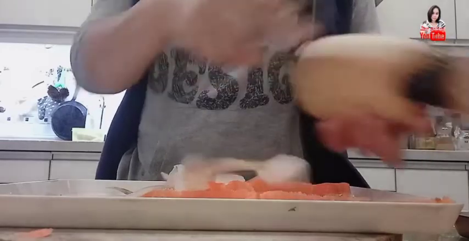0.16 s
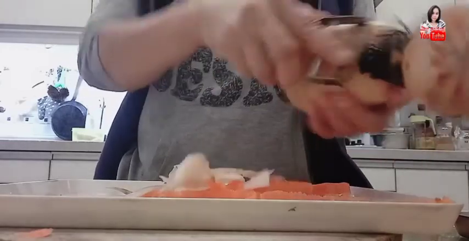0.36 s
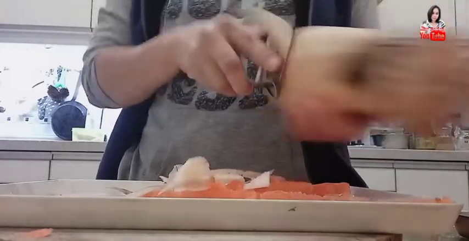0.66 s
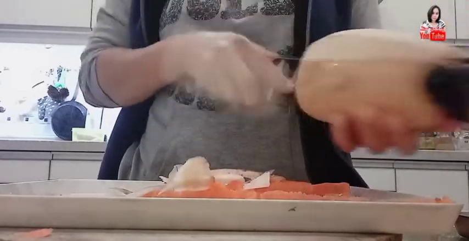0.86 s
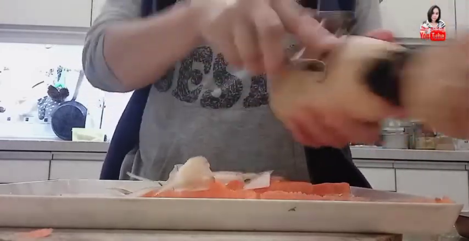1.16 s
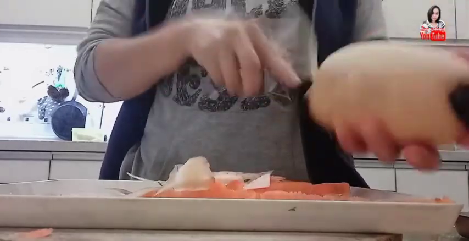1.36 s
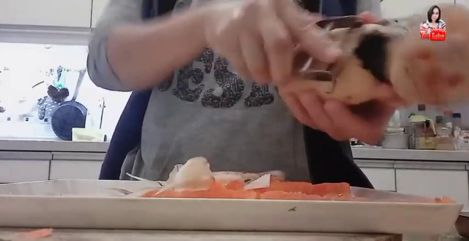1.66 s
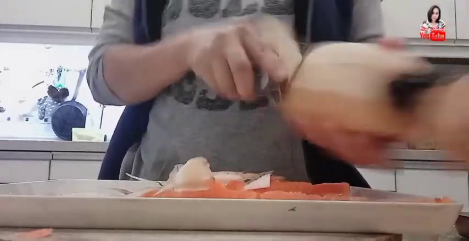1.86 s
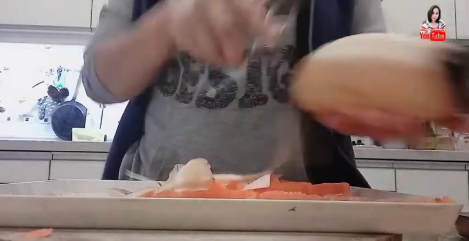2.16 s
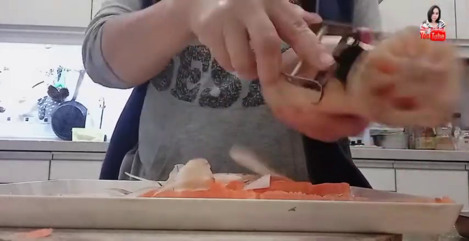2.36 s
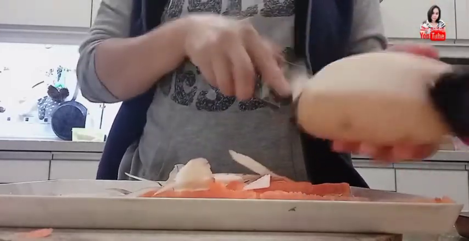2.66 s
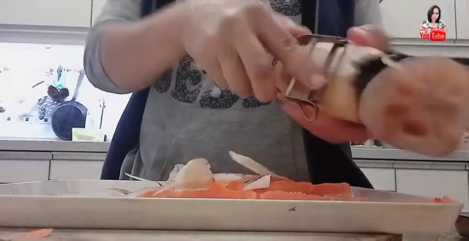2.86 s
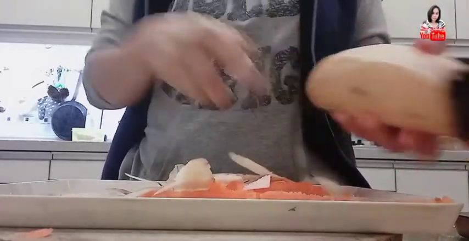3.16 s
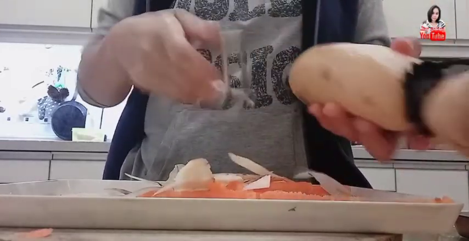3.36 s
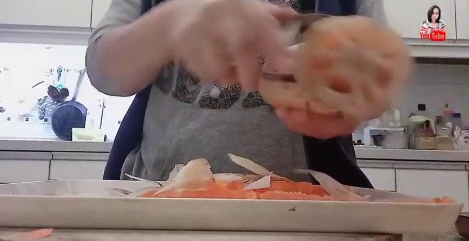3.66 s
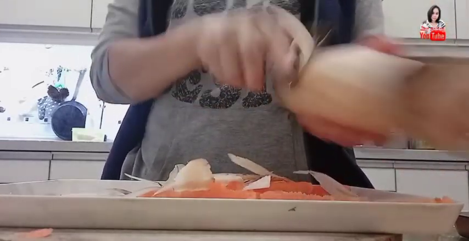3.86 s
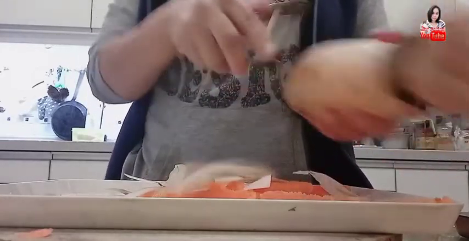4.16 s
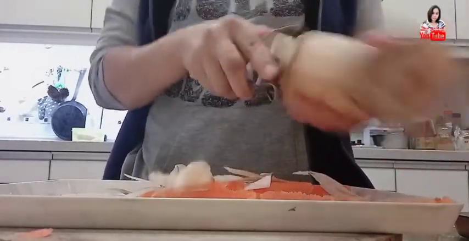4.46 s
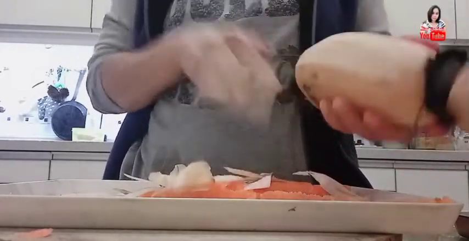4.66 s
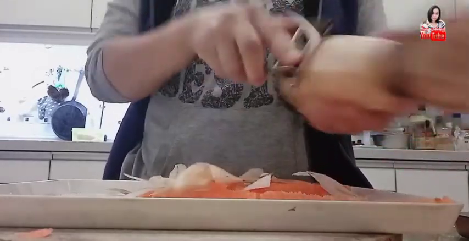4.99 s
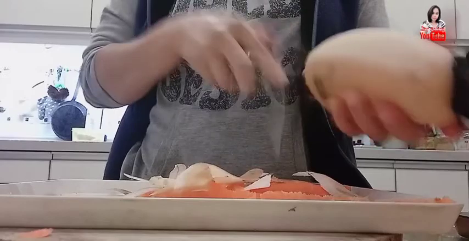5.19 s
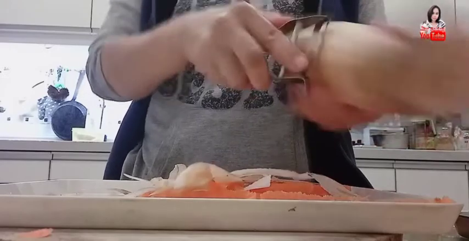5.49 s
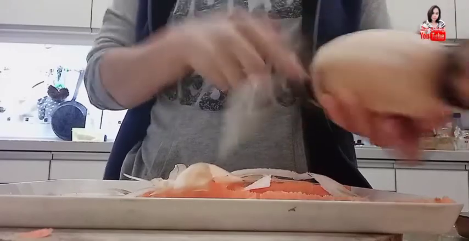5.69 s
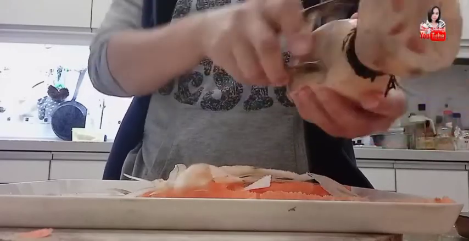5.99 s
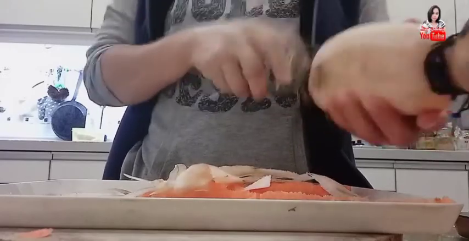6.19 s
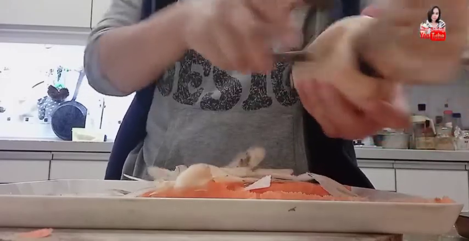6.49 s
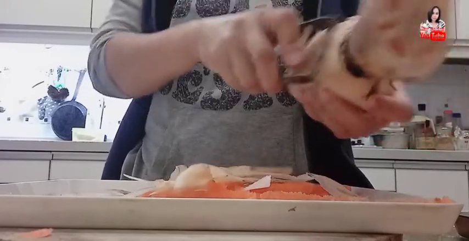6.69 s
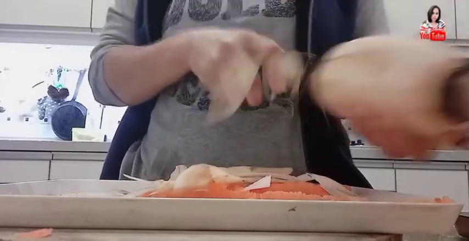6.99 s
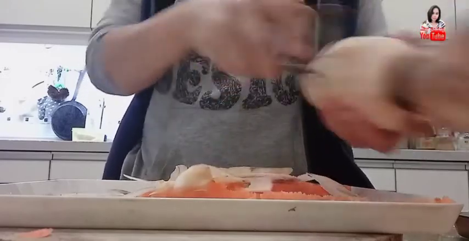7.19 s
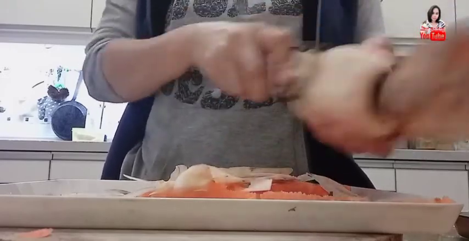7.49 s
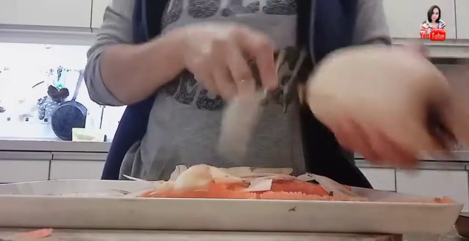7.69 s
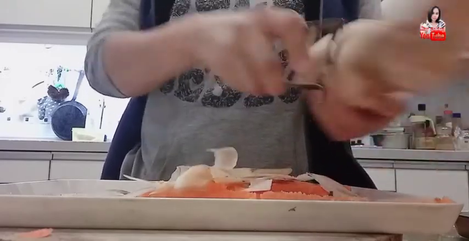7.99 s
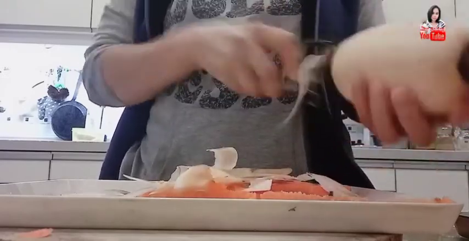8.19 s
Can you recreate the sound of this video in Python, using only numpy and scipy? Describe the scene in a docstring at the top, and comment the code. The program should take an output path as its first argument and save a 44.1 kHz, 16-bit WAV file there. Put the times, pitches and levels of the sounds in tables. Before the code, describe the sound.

Close in a hard, lightly reverberant kitchen, a swivel peeler scrapes a firm root in quick irregular strokes. It opens with a bright metallic ring and a short rasp; fuller, fibrous scrapes follow at about 0.6, 1.2 and 1.8 seconds, with a sharp bite near 1.6. Loose-blade clicks fill the gaps, clustering near 2.35, with soft knocks near 0.8, 2.0 and 3.1. After a lighter patch around 3 seconds, strokes resume at 3.8 and come closer together, with crisp bites at 4.3 and 5.4 and the heaviest dull thud at 5.6. A tiny rough upward squeak comes at 6.4, a hard bite at 6.6, then dense strong rasps near 6.9 and 7.4, a woody thump at 7.6 and final scrapes past 8. Thin steel rings fade quickly; a faint low appliance hum, gently beating, continues underneath.

```python
"""Peeling a root vegetable

A swivel peeler is drawn along a firm root over a tray, close to a phone microphone in a hard kitchen.
Snapping fibres (uneven noise) ring the root and hiss at the edge; the blade bites, knocks and rattles.
Freed steel rings and tray thuds are damped partials; a short rough squeak glides up.
A fan or fridge hums behind: noise bands and motor tones. The hard walls add a diffuse tail."""
import sys
import numpy as np
from scipy import signal
from scipy.fft import rfft, irfft
from scipy.io import wavfile
from scipy.ndimage import uniform_filter1d

SR = 44100
rng = np.random.default_rng(int(sys.argv[2]) if len(sys.argv) > 2 else 0)


def bounce(signal):
    """Save signal as a 16-bit WAV file at the path given by the first command-line argument."""
    frames = np.transpose(np.atleast_2d(signal))
    limited = np.clip(frames, -1, 1)
    pcm = np.round(limited * 32767).astype(np.int16)
    wavfile.write(sys.argv[1], SR, pcm)


N = 367792
T = np.arange(N) / SR

# resonances of the root and the gripping hand: (frequency [Hz], width [Hz], level [dB])
ROOT_MODES = [(462, 136, -9.5), (817, 166, -7), (1211, 210, -3), (1505, 99, -2), (1783, 140, -1),
              (2196, 228, -2.5), (2775, 343, -4), (3470, 490, -25.5)]


def undb(db):
    """Decibels to gain."""
    return 10 ** (np.asarray(db) / 20)


def unit(x):
    """Scale to rms 1."""
    return x / np.sqrt(np.mean(x ** 2))


def resonate(x, hz, width_hz):
    """Two-pole resonance, gain 1 at the centre."""
    return signal.lfilter(*signal.iirpeak(hz, hz / width_hz, fs=SR), x)


def colour(x, points):
    """Give x a (Hz, dB) spectrum, keeping the rms of white noise."""
    hz, db = np.transpose(points)
    bins_hz = np.fft.rfftfreq(N, 1 / SR)
    gain = undb(np.interp(np.log(bins_hz + 1), np.log(hz), db))
    return irfft(rfft(x) * unit(gain), N)


def walk(rate_hz):
    """Random levels, rms 1, held for 1 / rate_hz and slewed."""
    k = int(SR / rate_hz)
    steps = np.repeat(rng.standard_normal(N // k + 1), k)
    return unit(uniform_filter1d(steps, k)[:N])


def fibres(scatter_db, judder_db, judder_hz):
    """Dense snaps of uneven size; the blade's judder bunches them."""
    snaps = rng.standard_normal(N) * undb(scatter_db * rng.exponential(size=N))
    return unit(snaps * undb(judder_db * walk(judder_hz)))


def burst(start_s, rise_ms, fall_ms):
    """Square-law swell to a peak of 1, then exponential decay."""
    ms = 1000 * (T - start_s)
    return np.clip(ms / rise_ms, 0, 1) ** 2 * np.exp(-np.clip(ms - rise_ms, 0, None) / fall_ms)


def favour(hz):
    """Gain per root mode: the grip lifts modes near hz and lowers those far off."""
    range_db, width_octaves = 9, .17
    modes_hz = np.array(ROOT_MODES)[:, :1]
    nearness = np.exp(-(np.log2(modes_hz / hz) / width_octaves) ** 2)
    return undb(range_db * (nearness - .5))


def stroke_drive():
    """Each pull sinks in, swells, sags and lifts out; hiss follows tearing dB for dB."""
    # pulls of the blade: (time in the cut [s], swell [ms], sag [ms], entering level [dB], peak level [dB],
    # leaving level [dB], hiss re tearing [dB], favoured root frequency [Hz])
    strokes = [(0.0, 10, 63, -49, -47, -61.5, 2, 2360), (0.365, 4.6, 38, -45, -44.5, -52, -7, 1910),
               (0.618, 71, 107, -45, -37.5, -47, -4.5, 2040),
               (1.183, 50.5, 64, -49, -46.5, -48, -3.5, 2100), (1.61, 30, 10, -56, -46, -54, -6, 1980),
               (1.793, 58, 190, -44.5, -37.5, -52.5, -4, 1970),
               (2.424, 67, 104, -43.5, -40.5, -42, -4.5, 1840), (2.93, 46, 20, -60, -61, -53.5, -7, 1770),
               (3.03, 12, 71, -45, -52.5, -60, -4, 1820), (3.768, 118, 130, -46, -39.5, -47, -7, 2037),
               (4.321, 26, 6.9, -53, -43.5, -57, -16, 1880), (4.434, 74, 80, -48, -40.5, -46, -3, 2260),
               (4.625, 9.3, 18, -47.5, -40.5, -59, -9.5, 1940),
               (4.962, 69, 81, -47.5, -44.5, -45.5, -4, 2070),
               (5.459, 41, 85.5, -48, -42.5, -43, -5.5, 2420), (5.61, 5, 17, -62, -52, -70, -7, 1200),
               (6.03, 123, 48, -50, -41.5, -49.5, -4, 1970), (6.624, 15, 4.5, -49.5, -47.5, -53, -12, 1820),
               (6.69, 17, 9.2, -60, -46.5, -53, -5, 1830), (6.864, 32.4, 61, -40.5, -37, -42, -5, 1930),
               (6.99, 6.8, 14, -38, -42.5, -40, -11, 1520),
               (7.345, 53.5, 47, -45.5, -40.5, -44, -0.5, 1680),
               (7.562, 51, 56, -42, -40.5, -53.5, -3.5, 1900), (8.01, 46, 104, -48.5, -45, -45, -3.5, 2400),
               (8.205, 8.3, 9.1, -47, -41, -52, -12, 2290)]
    sink_ms, lift_ms, faint_db, touch_s = 27, 24.4, -24, .0068
    root, edge = np.zeros((len(ROOT_MODES), N)), np.zeros(N)
    for s, swell_ms, sag_ms, in_db, peak_db, out_db, hiss_db, hz in strokes:
        ms = np.cumsum([0, sink_ms, swell_ms, sag_ms, lift_ms]) - sink_ms
        times_s = s + ms / 1000
        levels_db = [in_db + faint_db, in_db, peak_db, out_db, out_db + faint_db]
        db = np.interp(T, times_s, levels_db)
        inside_s = np.minimum(T - times_s[0], times_s[-1] - T)
        touch = np.clip(inside_s / touch_s + 1, 0, 1)
        root += touch * undb(db) * favour(hz)
        edge += touch * undb(db + hiss_db)
    return root, edge


def bite_and_knock_drive():
    """Bites of the landing blade and soft knocks at stroke ends load root and edge; low ones are slower."""
    # bites and knocks: (time [s], root peak level [dB], edge re root peak [dB], favoured root frequency [Hz])
    bites_and_knocks = [(0.022, -44.5, 4, 2200), (0.332, -42.5, 7, 2170), (0.836, -41, -12, 1200),
                        (1.157, -42, 6.5, 1950), (1.579, -29, -3.5, 1880), (2.041, -38, -8, 1210),
                        (2.332, -41.5, 6, 1900), (2.895, -46, 4.5, 2350), (3.062, -42.5, 0, 1570),
                        (3.325, -53.5, 9, 2380), (3.699, -41.5, 6, 2600), (3.708, -36.5, -7, 2190),
                        (4.29, -32, -2, 2230), (4.43, -45, -21, 2300), (4.937, -39.5, -2.5, 1860),
                        (5.404, -32.5, 2.5, 2700), (5.599, -34, -8, 900), (5.98, -34.5, -3, 2820),
                        (6.59, -30, -6, 1750), (7.308, -32.5, 0.5, 1830), (7.553, -48, 8.5, 2350),
                        (7.638, -33, -31, 1200), (7.667, -39, -17, 1300), (7.962, -42.5, 6, 2880)]
    rise_ms, fall_ms, lead_s = 5.6, 5.2, .0033  # when 2000 Hz is favoured
    root, edge = np.zeros((len(ROOT_MODES), N)), np.zeros(N)
    for s, db, edge_db, hz in bites_and_knocks:
        stretch = (2000 / hz) ** .5
        shape = burst(s - lead_s * stretch, rise_ms * stretch, fall_ms * stretch) * undb(db)
        root += shape * favour(hz)
        edge += shape * undb(edge_db)
    return root, edge


def rattle_drive():
    """Pivot clicks drive the root; their hiss is duller the more goes into the root."""
    # clicks of the loose blade: (time [s], level [dB], root share re level [dB])
    rattles = [(0.175, -65, -1), (0.282, -62.5, 2), (0.576, -53, -3), (0.86, -43, -8), (0.9653, -58.5, 4),
               (1.1092, -52, -3), (1.324, -47, -10), (1.4706, -57.5, -9), (1.5254, -64, 4), (1.99, -42, -3),
               (2.075, -45, -17), (2.347, -42, -7.5), (2.356, -38, -10), (2.367, -49, -8),
               (2.635, -50, -12), (2.8104, -47.5, -6.5), (2.8459, -60.5, -7), (3.023, -64, 8),
               (3.135, -53, -8), (3.193, -51.5, -1), (3.3346, -57, -23), (3.3794, -63, 2.5),
               (3.405, -59, -10), (3.486, -62, -13), (4.0513, -44, -5), (4.09, -51.5, -5), (4.131, -65, 3),
               (4.2495, -49.5, -4), (4.6136, -39, -3), (4.6618, -46.5, -19), (4.69, -48.5, -4),
               (4.779, -57, -16), (4.8447, -64, 3), (5.135, -49, -19), (5.342, -58, -14), (5.366, -64, 5),
               (5.6638, -50.5, 4.5), (5.775, -56, -11), (6.2214, -47, 3), (6.2874, -44.5, -11),
               (6.573, -47, -0.5), (6.688, -56.5, 9.5), (7.0335, -45.5, -18), (7.129, -66.5, 7),
               (7.8201, -57, 10.5), (7.894, -64, 4.5), (8.034, -48, -3), (8.2493, -46.5, -5)]
    rise_ms, fall_ms, lead_s = 2.1, 5.4, .001
    root, edge, dull = np.zeros(N), np.zeros(N), np.zeros(N)
    for s, db, root_db in rattles:
        shape = burst(s - lead_s, rise_ms, fall_ms) * undb(db)
        root += shape * undb(root_db)
        edge += shape / (1 + undb(2 * root_db))
        dull += shape / (1 + undb(-2 * root_db))
    return root, edge, dull


def root_body(drives):
    """Parallel root resonances of alternating sign, one drive each."""
    out = np.zeros(N)
    for k, (hz, width_hz, db) in enumerate(ROOT_MODES):
        out += (-1) ** k * undb(db) * resonate(drives[k], hz, width_hz)
    return out


def patchy(x):
    """Split into narrow overlapping bands, 2 to 16 kHz, each with its own wandering level."""
    depth_db, per_octave, wander_hz = 3.5, 9, 14.
    place = per_octave * np.log2(np.fft.rfftfreq(N, 1 / SR) + 1)
    spectrum, out = rfft(x), np.zeros(N)
    for centre in range(11 * per_octave, 14 * per_octave + 1):
        band = irfft(spectrum * np.clip(1 - np.abs(place - centre), 0, 1), N)
        out += band * unit(undb(depth_db * walk(wander_hz)))
    return out


def peeling():
    """Fibre noise, shaped by strokes, bites, knocks and rattles, excites root modes and edge hiss."""
    # hiss of the cutting edge, with the microphone port peak: (frequency [Hz], relative density [dB per Hz])
    edge_spectrum = [(1940, -24), (3300, -16.5), (3660, -6), (4790, -6.5), (6460, -2.5), (7510, -6),
                     (8170, -5.5), (10000, -11.5), (12600, -16), (13900, -10), (14600, 0.5), (15200, 2),
                     (15700, -4)]
    wander_db, wander_hz, dull_hz = 3.0, 30., 9600
    stroke_root, stroke_edge = stroke_drive()
    bite_root, bite_edge = bite_and_knock_drive()
    rattle_root, rattle_edge, dull = rattle_drive()
    root = stroke_root + bite_root + rattle_root
    edge = stroke_edge + bite_edge + rattle_edge

    tear = fibres(scatter_db=2.5, judder_db=1.5, judder_hz=152.0)
    wander = np.array([undb(wander_db * walk(wander_hz)) for _ in ROOT_MODES])
    torn = root_body(tear * root * wander) / np.std(root_body(tear * wander))

    hiss = fibres(scatter_db=1.5, judder_db=1.0, judder_hz=196.0)
    lowpass = signal.butter(4, dull_hz, fs=SR, output="sos")
    muffled = signal.sosfilt(lowpass, hiss * dull)
    return torn + patchy(colour(hiss * edge + muffled, edge_spectrum))


def motor_tone(hz, db):
    """Sine with slight random drift in pitch and level."""
    phase = 2 * np.pi * np.cumsum(hz * (1 + .002 * walk(10.))) / SR
    return np.sqrt(2) * np.sin(phase) * undb(db + 1.2 * walk(22.0))


def background():
    """Room noise, wavering hum (noise through resonator pairs), a motor tone and one that beats."""
    # room noise: (frequency [Hz], relative density [dB per Hz])
    air_spectrum = [(18, -73), (30, -40), (64, -17), (208, -3.5), (250, -11.5), (325, -8), (469, -17),
                    (1140, -26), (1610, -32), (1830, -29), (3010, -34), (3440, -39), (3820, -40),
                    (13400, -60.5), (15700, -55)]
    # hum: (frequency [Hz], width of each resonator in the pair [Hz], rms level [dB])
    hum_bands = [(102.9, 14.5, -67.5), (152.4, 14, -66.5), (198.7, 11.7, -69), (248.3, 14, -70.5),
                 (306.3, 7, -68.5), (2990, 45, -86.5)]
    air_db, beat_hz, beat_peak_s = -59.5, .565, 3.77
    out = undb(air_db + 1.0 * walk(2.995)) * colour(rng.standard_normal(N), air_spectrum)
    for hz, width_hz, db in hum_bands:
        once = resonate(rng.standard_normal(N), hz, width_hz)
        out += undb(db) * unit(resonate(once, hz, width_hz))
    beat = np.clip(0.58 + 1.1 * np.cos(2 * np.pi * beat_hz * (T - beat_peak_s)), 0, 1.3)
    return out + motor_tone(199.6, -60) + beat * motor_tone(333.3, -66.5)


def kitchen(x):
    """Diffuse tail of hard walls: noise bands, each with its own decay."""
    # tail by band: (low edge [Hz], high edge [Hz], t60 [s], level [dB])
    tail_bands = [(203, 1410, 0.28, -8.5), (1580, 13200, 0.42, -12), (4330, 9500, 0.45, -8.5),
                  (9500, 20000, 0.35, -15)]
    t, tail, onset_s = T[:SR], np.zeros(SR), .0094
    for low_hz, high_hz, t60_s, db in tail_bands:
        bandpass = signal.butter(2, (low_hz, high_hz), "band", fs=SR, output="sos")
        band = signal.sosfilt(bandpass, rng.standard_normal(SR))
        fade = undb(-60 * t / t60_s) * np.clip(t / onset_s, 0, 1)
        tail += undb(db) * band * fade / np.sqrt(np.sum(fade ** 2))
    return signal.fftconvolve(x, tail)[:N]


def partial(hz, t60_s):
    """Half a second of a decaying sine."""
    t = T[:SR // 2]
    return np.sin(2 * np.pi * hz * t) * undb(-60 * t / t60_s)


def blade_rings():
    """The freed blade rings: steel modes nearest the struck pitch are favoured, and the whole buzzes."""
    # rings: (time [s], level [dB], frequency struck hardest [Hz])
    rings = [(0.024, -51, 8500), (0.024, -59, 4150), (0.024, -53, 10550), (0.86, -63, 12300),
             (1.3234, -66, 5110), (1.4706, -74, 8300), (2.076, -60.5, 12300), (2.076, -62, 5110),
             (3.3346, -60, 5200), (3.3346, -66, 12300), (3.486, -77, 8260), (3.486, -74, 12300),
             (4.0517, -64, 12300), (4.6618, -54, 12300), (4.6618, -66, 5110), (5.135, -59, 8140),
             (5.135, -65, 12300), (5.6643, -62, 8380), (6.2876, -71, 8380), (7.0337, -64, 12300),
             (7.0337, -64, 8380), (7.69, -62, 8200)]
    # steel modes: (nominal frequency [Hz], level [dB], t60 [s])
    blade_modes = [(5400, -1, 0.21), (5050, 2, 0.11), (7600, -4, 0.2), (8300, 7, 0.11), (12380, -1, 0.15),
                   (12300, -8, 0.098), (14620, -6, .1), (10370, -7.5, 0.18), (4110, -11, .25)]
    far_db_per_octave, far_floor_db, mix_db, detune, buzz_db = -34, -16, 2.0, .005, 4.5
    out = np.zeros(N + SR)
    for s, db, struck_hz in rings:
        start = int(s * SR)
        for hz, mode_db, t60_s in blade_modes:
            mix, shift = rng.standard_normal(2)
            away_db = max(far_db_per_octave * abs(np.log2(hz / struck_hz)), far_floor_db)
            tone = partial(hz * (1 + detune * shift), t60_s)
            out[start:start + len(tone)] += tone * undb(db + mode_db + away_db + mix_db * mix)
    return out[:N] * undb(buzz_db * walk(300.))


def thuds():
    """Hand, root or peel on the tray: a few damped low partials."""
    # thuds: (time [s], level [dB], pitch [Hz])
    hits = [(0.831, -43, 364), (2.038, -41, 485), (3.06, -43, 466), (3.972, -41.5, 480), (5.6, -29.5, 454),
            (6.277, -46, 462), (6.436, -50, 490), (7.635, -34, 634), (8.17, -42.5, 636)]
    # partials: (multiple of the pitch, level [dB], t60 [s])
    thud_modes = [(1.002, 2, 0.044), (1.4, -3, 0.031), (1.85, -3, 0.033), (2.5, -11, 0.054)]
    out = np.zeros(N + SR)
    onset = 1 - np.exp(-T[:SR // 2] / 0.001)
    for s, db, hz in hits:
        start = int(s * SR)
        tone = sum(undb(mode_db) * partial(hz * k, t60_s) for k, mode_db, t60_s in thud_modes)
        out[start:start + len(tone)] += undb(db) * tone * onset
    return out[:N]


def squeak():
    """A rough tone, its pitch jittered, glides up and levels off."""
    start_s, length_s, from_hz, to_hz, db = 6.44, .085, 600, 1150, -67
    x = np.clip((T - start_s) / length_s, 0, 1)
    hz = to_hz - (to_hz - from_hz) * (1 - x) ** 2
    phase = 2 * np.pi * np.cumsum(hz * (1 + 0.06 * walk(300.))) / SR
    return undb(db) * np.sqrt(np.sin(np.pi * x).clip(0)) * np.sin(phase)


def scene():
    """Nearly mono: smeared treble, added left and subtracted right, sets the channels apart."""
    side_db = -13
    near = peeling() + blade_rings() + thuds() + squeak()
    mid = near + kitchen(near) + background()
    smear = rng.standard_normal(400) * np.hanning(400)
    side = signal.fftconvolve(mid, smear / np.linalg.norm(smear), "same")
    side = resonate(side, 12400.0, 4300.0)
    side = undb(side_db) * resonate(side, 11000.0, 6700.0)
    return np.array([mid + side, mid - side])


def record(dry):
    """Steep elliptic low-pass: nothing is heard above about 15.9 kHz."""
    top_hz = 15850
    return signal.sosfilt(signal.ellip(10, .3, 70, top_hz, fs=SR, output="sos"), dry)


dry = scene()
out = record(dry)
bounce(out)
```